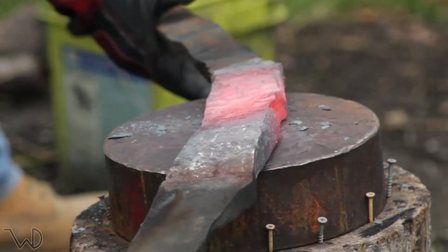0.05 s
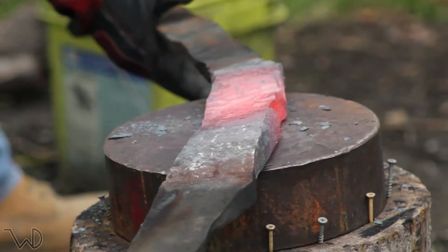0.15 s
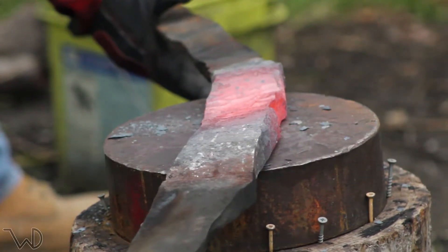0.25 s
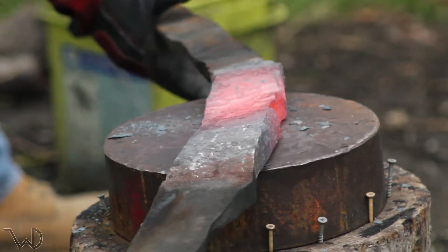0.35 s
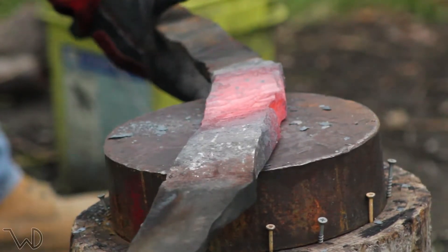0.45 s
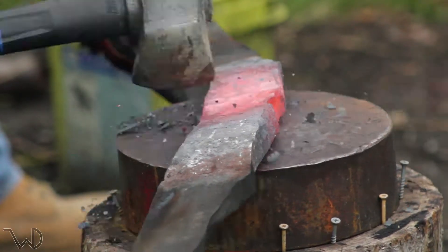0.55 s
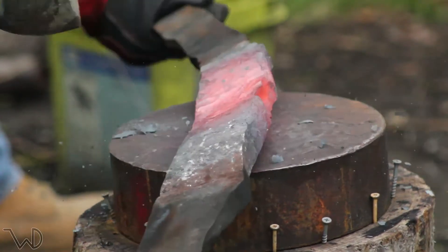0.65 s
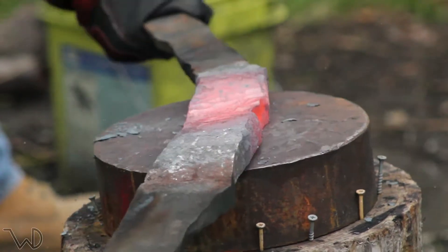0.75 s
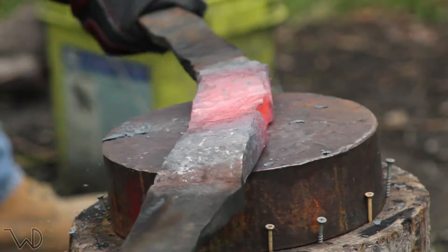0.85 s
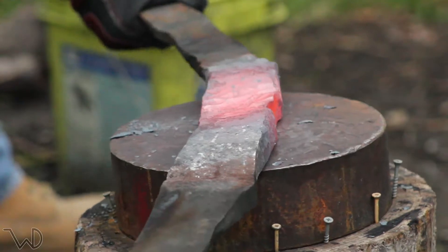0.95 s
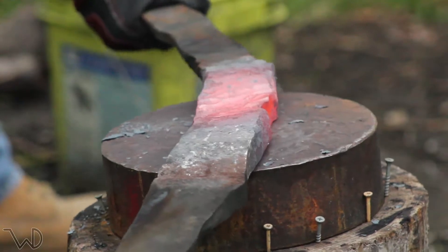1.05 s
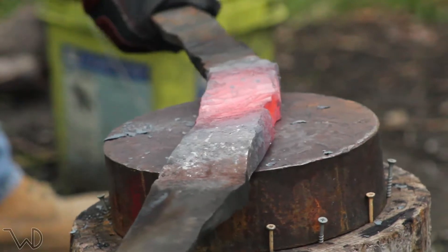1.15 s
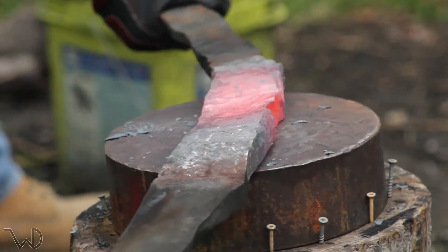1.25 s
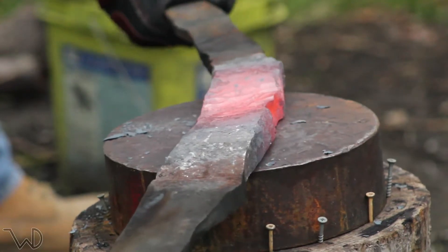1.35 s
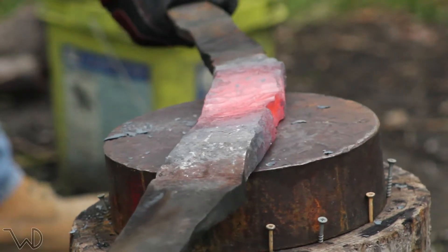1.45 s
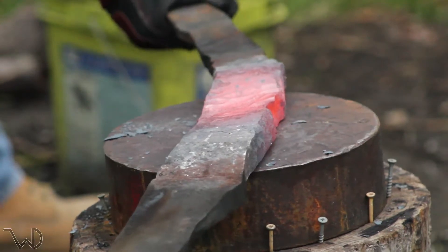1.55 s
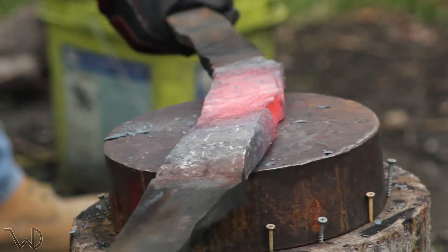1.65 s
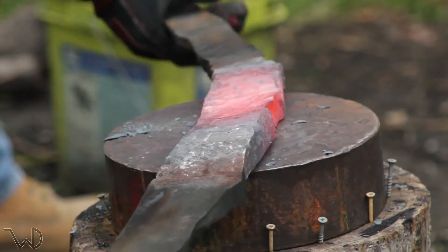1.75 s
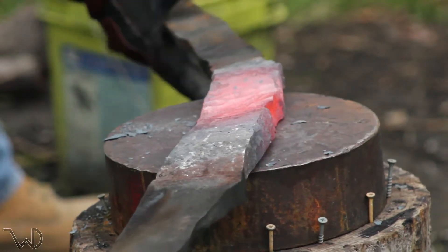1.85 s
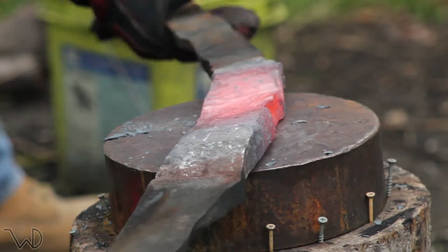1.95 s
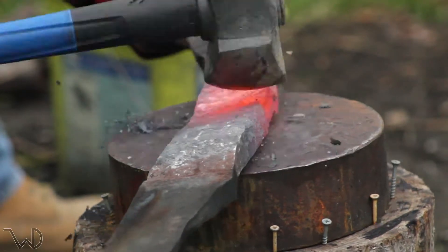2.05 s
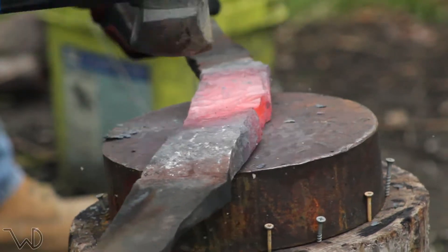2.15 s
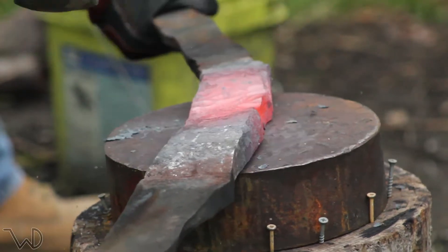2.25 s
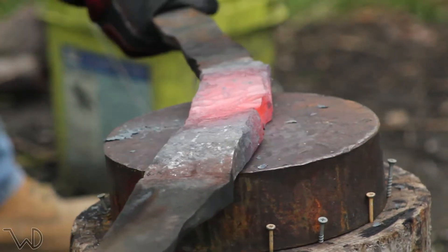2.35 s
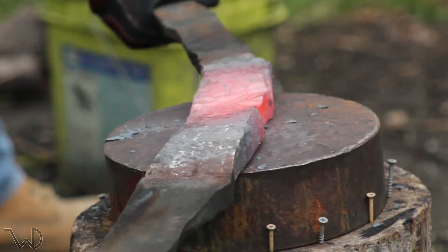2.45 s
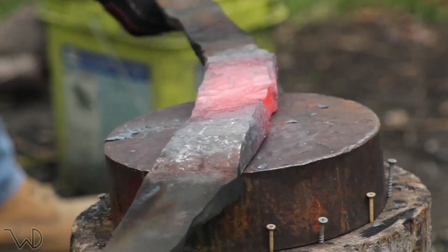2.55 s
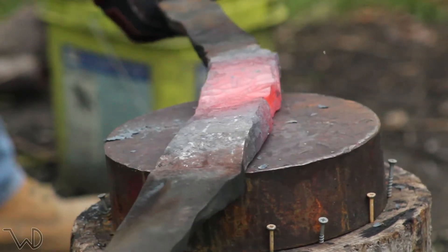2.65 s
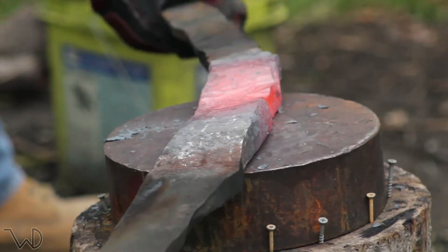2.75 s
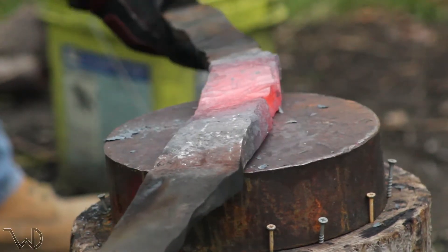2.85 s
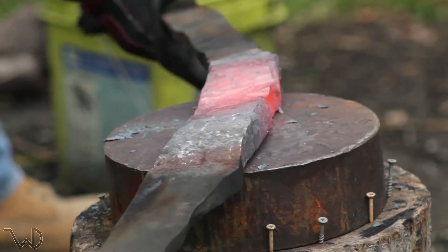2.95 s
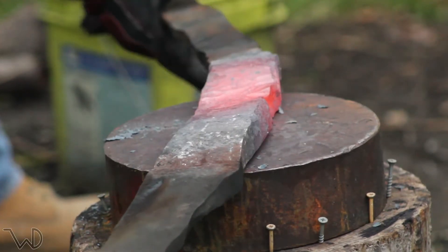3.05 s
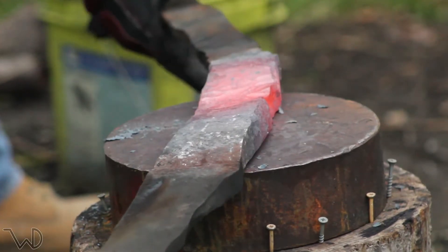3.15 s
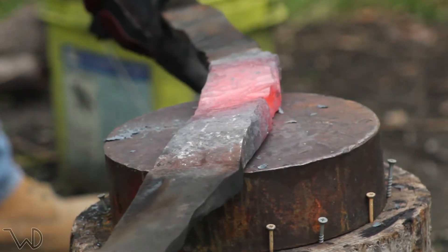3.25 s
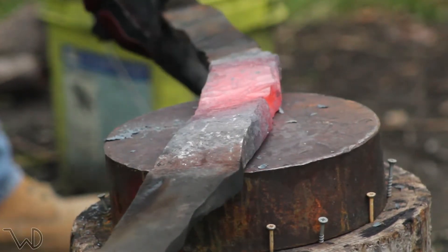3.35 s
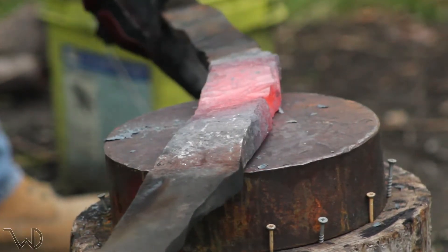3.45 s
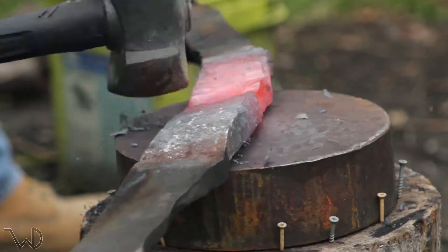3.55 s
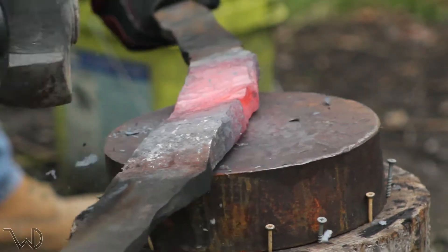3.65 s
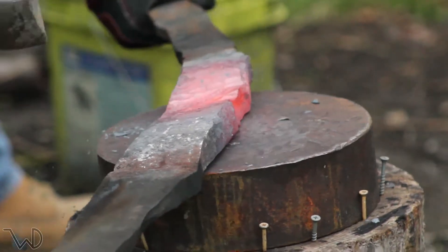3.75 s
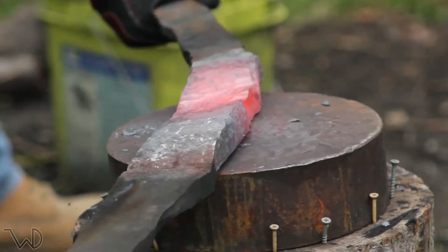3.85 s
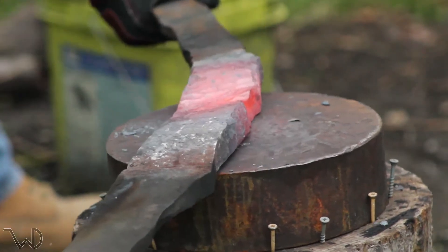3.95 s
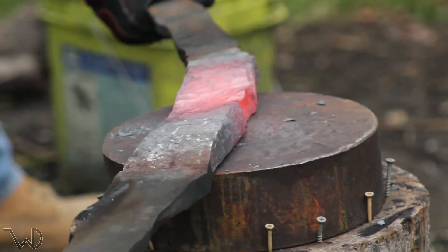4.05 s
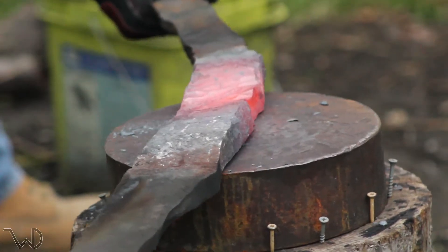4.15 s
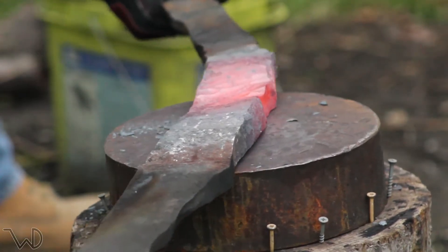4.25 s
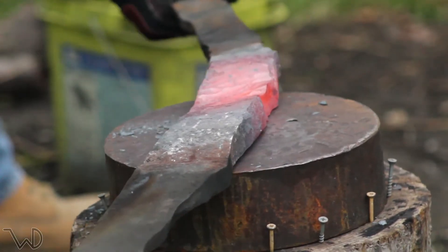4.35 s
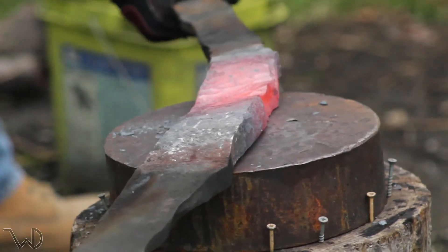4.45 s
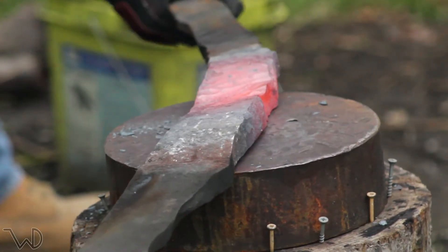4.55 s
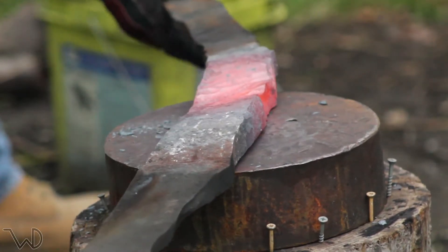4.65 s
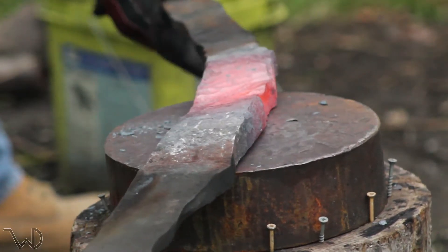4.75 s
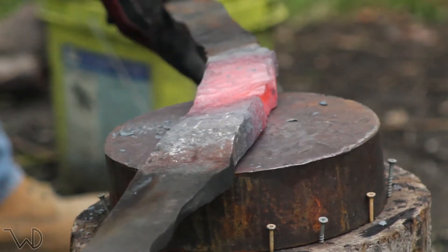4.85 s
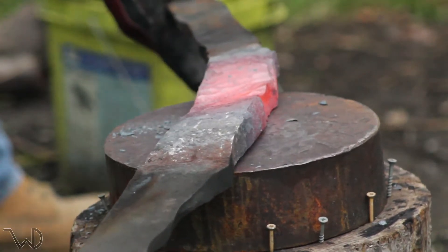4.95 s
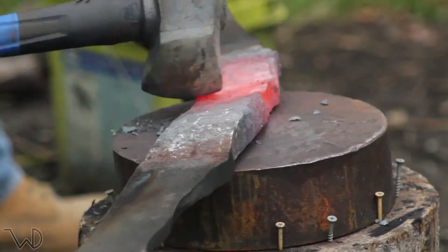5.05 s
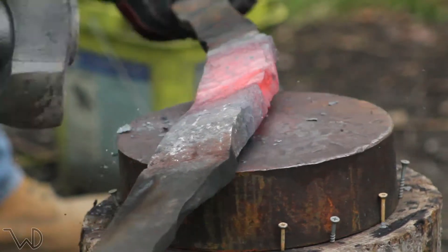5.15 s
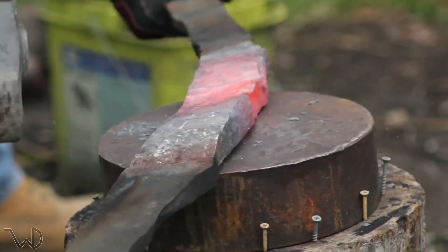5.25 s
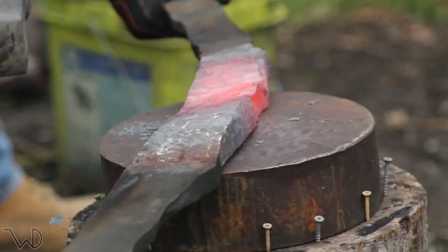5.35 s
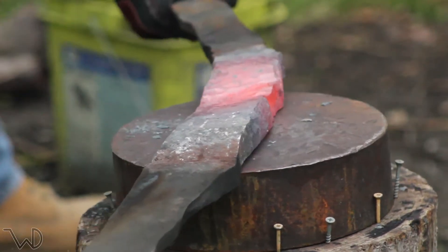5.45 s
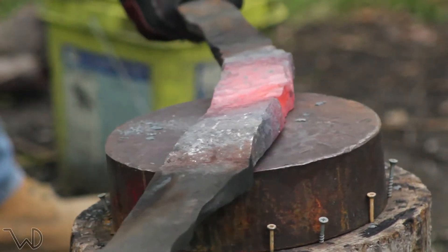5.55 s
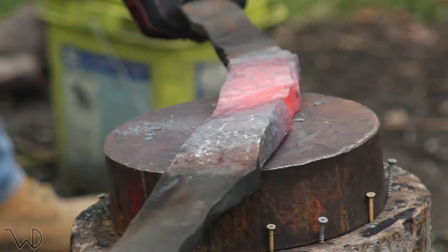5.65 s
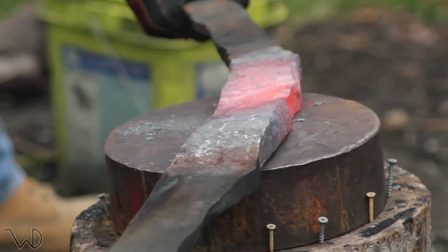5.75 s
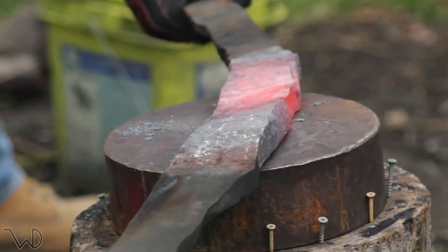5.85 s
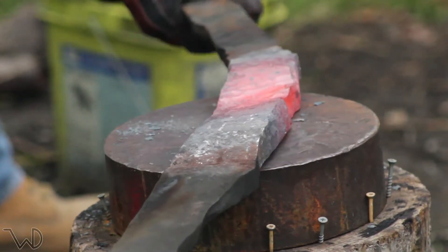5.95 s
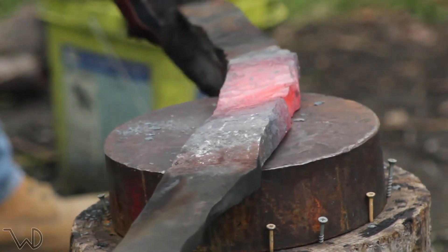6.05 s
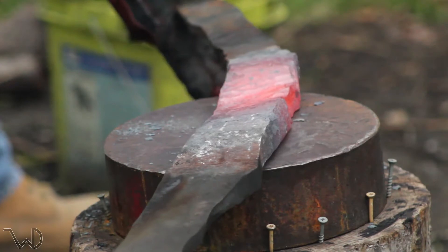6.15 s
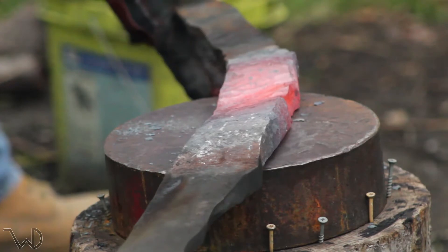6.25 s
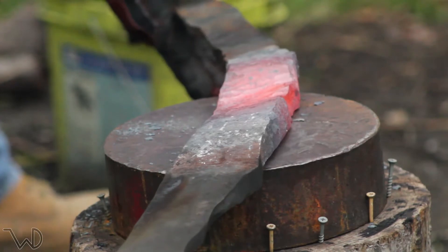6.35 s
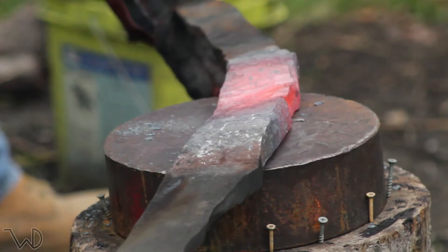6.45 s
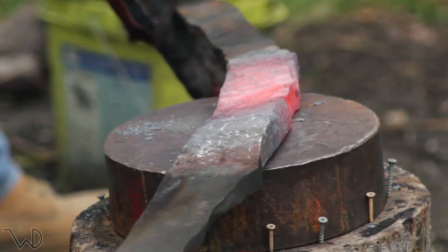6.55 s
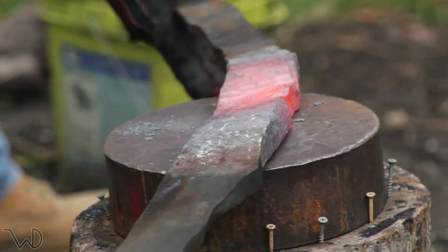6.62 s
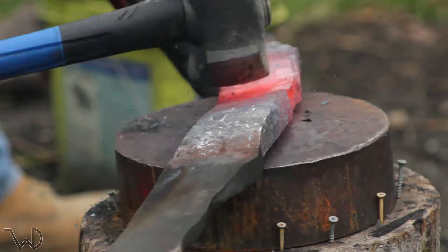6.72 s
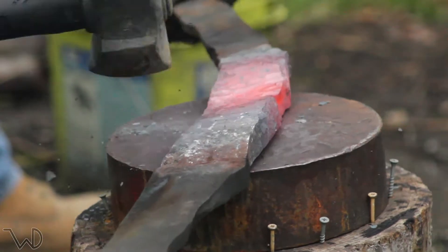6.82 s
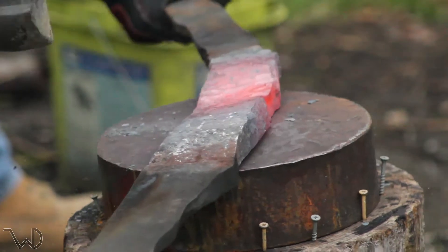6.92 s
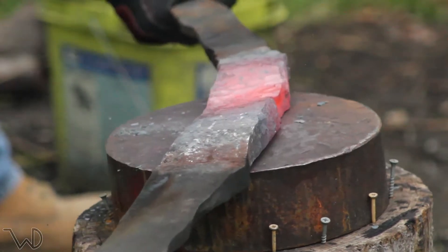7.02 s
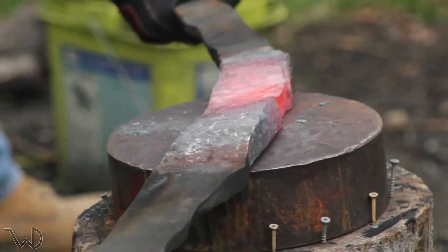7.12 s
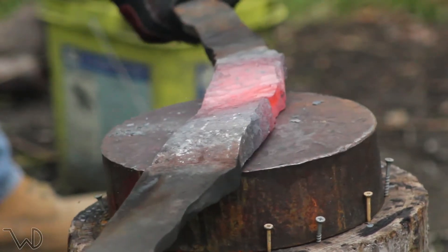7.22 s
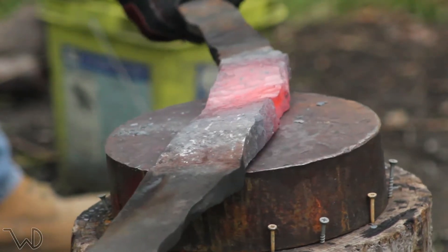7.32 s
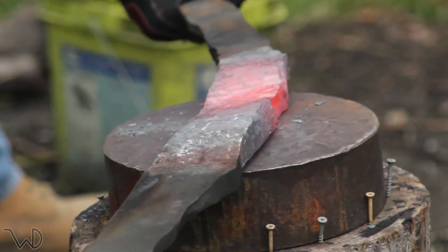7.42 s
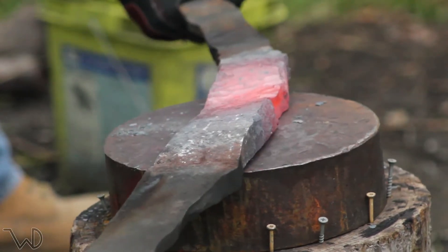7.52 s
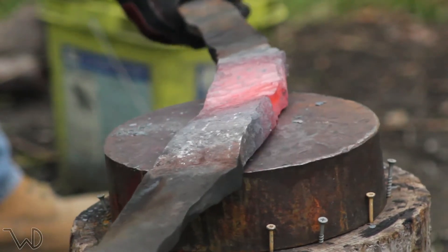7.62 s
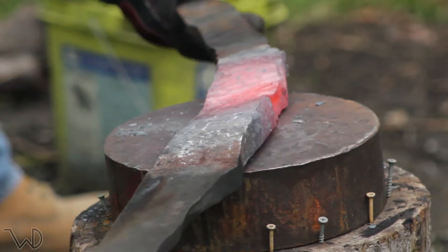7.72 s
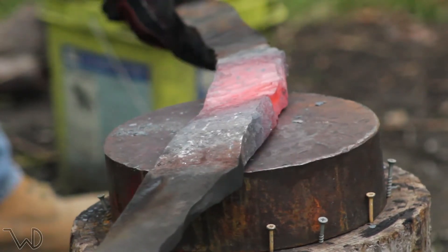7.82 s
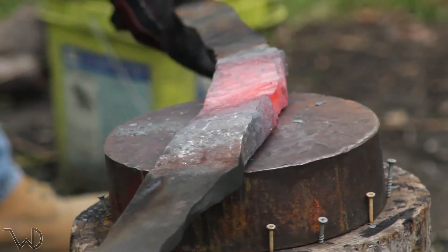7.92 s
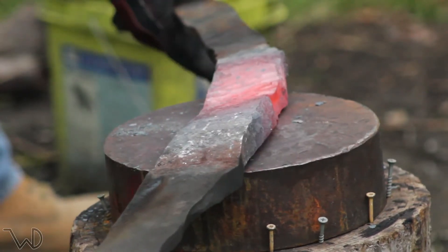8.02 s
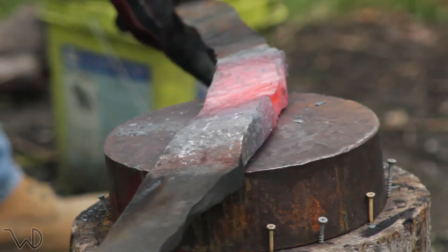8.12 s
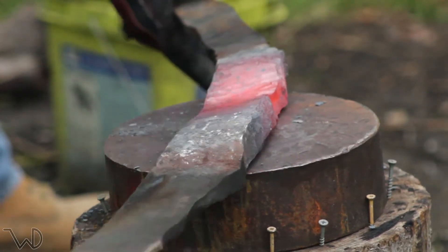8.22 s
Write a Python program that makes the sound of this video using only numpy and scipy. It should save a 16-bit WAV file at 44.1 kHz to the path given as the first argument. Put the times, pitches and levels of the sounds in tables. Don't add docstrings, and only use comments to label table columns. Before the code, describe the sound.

Outdoors, a hammer strikes steel on a solid block every second and a half, each overloaded clang ringing out between gusts of wind.

```python
import sys
import numpy as np
from scipy import signal
from scipy.fft import rfft, irfft, next_fast_len
from scipy.io import wavfile
from scipy.ndimage import uniform_filter1d

SR = 44100
rng = np.random.default_rng(int(sys.argv[2]) if len(sys.argv) > 2 else 0)


def rack_gain(trim_db):
    fader = np.asarray(trim_db, float)
    return 10 ** (fader / 20)


def wav_out(sig):
    wavfile.write(sys.argv[1], SR, np.round(np.clip(np.atleast_2d(sig).T, -1, 1) * 32767).astype(np.int16))


N = 365148


def at_hz(points, hz):
    f, *columns = np.transpose(points)
    return [np.interp(np.log(hz), np.log(f), c) for c in columns]


def in_time(rows):
    return np.interp(np.arange(N) / SR, *np.transpose(rows))


def rms_one(x):
    return x / np.sqrt(np.mean(x ** 2))


def band(x, low_hz, high_hz, order):
    return signal.sosfilt(signal.butter(order, [low_hz, high_hz], "band", fs=SR, output="sos"), x)


def noise_band(low_hz, high_hz):
    return rms_one(band(rng.standard_normal(N), low_hz, high_hz, order=2))


def low_pass(x, order, cut_hz):
    return signal.sosfilt(signal.butter(order, cut_hz, fs=SR, output="sos"), x)


def bands(low_hz, count, colour=rms_one):
    white = colour(rng.standard_normal((2, next_fast_len(N))))[:, :N]
    edges = low_hz * 2 ** (np.arange(count + 1) / 2)
    for k in range(count):
        low, high = edges[k:k + 2]
        yield np.sqrt(low * high), band(white[k % 2], low, high, order=2)


def drift(rate_hz):
    r = np.exp(-80 * np.pi * rate_hz / SR)
    slow = signal.lfilter([1], [1, -2 * r, r * r], rng.standard_normal(N // 40 + 2002))[2000:]
    return np.interp(np.arange(N) / 40, np.arange(len(slow)), rms_one(slow))


def clicks(times_s, sizes):
    out = np.full(N, 1e-18)
    out[np.round(np.asarray(times_s) * SR).astype(int)] = sizes
    return out


def dying(x, t60_s):
    return signal.lfilter([1], [1, -rack_gain(-60 / (t60_s * SR))], x)


def ring(x, hz, t60_s):
    r = rack_gain(-60 / (t60_s * SR))
    w = 2 * np.pi * hz / SR
    return signal.lfilter([0, np.sin(w)], [1, -2 * r * np.cos(w), r * r], x)


def swells(rows):
    t = np.arange(N) / SR
    return sum(rack_gain(level_db) * np.exp(-.5 * ((t - s) / spread_s) ** 2) for s, level_db, spread_s in rows)


# (frequency [Hz], density [dB per Hz])
FORGE_SPECTRUM = [(59, -30), (100, -12.5), (192, -7), (340, -1), (420, -1.5), (861, -0.5), (1370, -2),
                  (1490, -2.5), (5870, -7.5), (8950, -16.5), (14200, -102), (15500, -57)]
# (time [s], level [dB])
FORGE_LEVEL = [(0.0, -41.5), (1.5, -43), (3.6, -43.5), (6.0, -44), (8.28, -43)]


def forge():
    out = 0
    for hz, noise in bands(88.6, count=15):
        out = out + rack_gain(at_hz(FORGE_SPECTRUM, hz)[0] + 0.39 * drift(10.0)) * noise
    return rack_gain(in_time(FORGE_LEVEL) - 1.87) * rms_one(low_pass(out, 4, 11000))


def traffic():
    return rack_gain(-72.5) * noise_band(22, 84)


# (start [s], length [s], level [dB])
GUSTS = [(.17, .08, -53), (.3, .15, -57), (.52, 0.17, -47), (0.798, 0.2, -44), (1.4, .1, -60),
         (1.7, .1, -55), (2.015, .2, -52), (2.35, 0.28, -50.5), (3.01, 0.52, -58), (3.146, 0.11, -44),
         (3.534, 0.13, -59), (3.834, 0.04, -44), (3.95, 0.205, -56), (4.39, 0.524, -40.5),
         (4.92, .39, -40.5), (5.322, 0.24, -48.5), (7.338, 0.27, -50), (7.75, .35, -64), (8.19, .08, -47)]
CALM_DB, GUST_EDGE_S = -73, 0.037


def gust_air():
    now = np.arange(N) / SR
    air = np.full(N, rack_gain(CALM_DB))
    for start_s, length_s, level_db in GUSTS:
        inside_s = np.minimum(now - start_s, start_s + length_s - now)
        air += rack_gain(level_db) * np.clip(inside_s / GUST_EDGE_S + .5, 0, 1)
    return air


# (time [s], peak [dB], frequency [Hz])
BUFFETS = [(1.469, -45, 61.9), (1.71, -40, 110), (2.569, -32.5, 220), (3.19, -36, 110), (4.03, -33, 162),
           (4.423, -34, 87), (4.446, -34, 167), (4.511, -23.5, 283), (4.584, -29, 165), (4.605, -19.5, 119),
           (4.622, -13, 238), (4.641, -17, 214), (4.664, -13.5, 246), (4.7, -19.5, 320), (4.729, -38, 98),
           (4.804, -21.5, 263), (4.82, -23.5, 215), (4.87, -29, 320), (5.02, -35, 107), (5.046, -39, 132),
           (5.09, -34, 178), (5.135, -26, 70), (7.379, -38, 119), (7.414, -34.5, 110), (8.219, -42, 90)]
# (time [s], peak [dB], frequency [Hz])
SNAPS = [
    (2.555, -38, 80.7),
    (4.069, -29, 190),
    (7.477, -28.5, 270),
    (7.576, -43, 130),
]
BUFFET_SPREAD_S, SNAP_SPREAD_S = 0.00414, 0.0019
TEAR_DB, TEAR_SPREAD_S, GUST_TEAR_DB = -22, 0.0097, -16.5


def buffets():
    out = np.zeros(N)
    half = 1500
    t = np.arange(-half, half) / SR
    spreads_s = [BUFFET_SPREAD_S] * len(BUFFETS) + [SNAP_SPREAD_S] * len(SNAPS)
    for (s, peak_db, hz), spread_s in zip(BUFFETS + SNAPS, spreads_s):
        low, high = rng.uniform(0, 2 * np.pi, 2)
        swing = np.sin(2 * np.pi * hz * t + low)
        swing += 0.21 * np.sin(2 * np.pi * 1.95 * hz * t + high)
        swing += .5 * np.sin(2 * np.pi * 0.59 * hz * t + high)
        snap = np.exp(-.5 * ((t - 0.55 * spread_s) / 0.00055) ** 2)
        swing += 0.57 * np.sign(np.sin(low)) * snap
        centre = round((s + spread_s) * SR)
        out[centre - half:centre + half] += rack_gain(peak_db - 3) * swing * np.exp(-.5 * (t / spread_s) ** 2)
    return out


def wind():
    air = gust_air()
    rumble = air * rack_gain(6.2 * drift(25) - 6.0) * noise_band(45, 170)
    tears = swells([(s, peak_db + TEAR_DB, TEAR_SPREAD_S) for s, peak_db, hz in BUFFETS])
    tears = tears + rack_gain(GUST_TEAR_DB) * air
    tearing = tears * rack_gain(3.9 * drift(54)) * noise_band(170, 480)
    return rumble + tearing + buffets()


# (time [s], clang [dB], brightness [dB per octave], decay stretch [ratio])
BLOWS = [
    (.5738, 4, 0., 0.93),
    (2.0719, -0.5, 3.5, 1.16),
    (3.5654, 3, -0.05, 1.05),
    (5.107, 3.5, 0.5, 1.035),
    (6.7396, 3, 2, 1.08),
]
BLOW_S = np.array(BLOWS)[:, 0]
THUD_DB = [14.4, 0.54, 13.5, 10.7, 11]


def thumps():
    thud = ring(clicks(BLOW_S, rack_gain(np.array(THUD_DB))), hz=1325, t60_s=0.015)
    return thud + ring(clicks(BLOW_S, rack_gain(-16.5)), hz=74.6, t60_s=0.17)


def throb(noise, hz, width_hz):
    line = ring(band(noise, hz / 1.05, hz * 1.05, order=2), hz, np.log(1000) / (np.pi * width_hz))
    return line / np.sqrt(2 * uniform_filter1d(line ** 2, size=5000) + 1e-12)


# (frequency [Hz], t60 [s], mean-spot level [dB], along
# [dB/step], across [dB/step])
STEEL = [(885.0, 0.3, -29.0, 8.0, -2.0), (1002.0, 0.3, -26.0, 0.0, -0.0), (1208.0, 0.88, -27.0, 1.0, 3.0),
         (1332.0, 0.36, -26.0, -0.0, 8.0), (1464.0, 0.36, -16.0, 0.0, 3.0), (1556.0, 0.32, -19.0, -5.0, 6.0),
         (1688.0, 0.32, -16.0, -4.0, -3.0), (1884.0, 0.7, -23.0, -4.0, -5.0),
         (2068.0, 0.88, -29.0, 2.0, -0.0), (2141.0, 0.64, -22.0, -0.0, 3.0),
         (2380.0, 0.84, -22.0, -5.0, 3.0), (2518.0, 0.66, -23.0, 1.0, 4.0),
         (2640.0, 0.9, -23.0, -5.0, -2.0), (2905.0, 0.34, -20.0, 2.0, -1.0),
         (2986.0, 0.82, -24.0, -3.0, -1.0), (3315.0, 0.46, -17.0, -4.0, 2.0),
         (3636.0, 0.56, -15.0, -4.0, -1.0), (3811.0, 0.36, -22.0, 0.0, 4.0),
         (3960.0, 0.36, -22.0, 7.0, -0.0), (4060.0, 0.48, -19.0, -1.0, -4.0),
         (4184.0, 0.54, -29.0, 1.0, 3.0), (4520.0, 0.56, -26.0, 1.0, -7.0), (5026.0, 0.4, -19.0, 3.0, 3.0),
         (4934.0, 0.54, -15.0, -1.0, -3.0), (5394.0, 0.5, -22.0, -3.0, -0.0),
          (5497.0, 0.56, -18.0, -2.0, -3.0), (6042.0, 0.48, -20.0, -3.0, -2.0),
          (6228.0, 0.52, -24.0, -3.0, -4.0), (6480.0, 0.46, -23.0, -2.0, -2.0),
          (7120.0, 0.48, -22.0, -1.0, -3.0), (7652.0, 0.4, -7.0, 3.0, -10.0),
          (9456.0, 0.44, -29.0, -3.0, 5.0), (9528.0, 0.56, -23.0, 2.0, 0.0),
          (11040.0, 0.66, -43.0, -3.0, -2.0), (13138.0, 0.5, -41.0, 3.0, 2.0),
          (13650.0, 0.44, -44.0, 3.0, 2.0), (14620.0, 0.78, -70.0, 7.0, -0.0)]
# (mean-spot level [dB], along [dB/step], across [dB/step])
STEEL_DIRECT = [(-34.0, 1.0, 4.0), (-25.0, 3.0, 1.0), (-27.0, -0.0, 8.0), (-21.0, 1.0, 6.0),
                (-22.0, -6.0, -1.0), (-23.0, -2.0, 3.0), (-22.0, -8.0, 4.0), (-22.0, -6.0, 6.0),
                (-32.0, 7.0, 6.0), (-20.0, -2.0, 2.0),
                (-25.0, 2.0, 4.0), (-30.0, -3.0, 4.0), (-17.0, -5.0, 4.0), (-37.0, 6.0, 4.0),
                (-20.0, -6.0, 2.0), (-30.0, -5.0, 3.0), (-18.0, -5.0, 4.0), (-27.0, 1.0, 1.0),
                (-30.0, -1.0, -4.0), (-30.0, -7.0, -7.0), (-28.0, 1.0, 7.0), (-34.0, 1.0, -1.0),
                (-23.0, -3.0, -2.0),
                (-16.0, 1.0, 1.0), (-33.0, -6.0, -2.0), (-19.0, -5.0, 3.0), (-30.0, 5.0, -5.0),
                 (-26.0, 3.0, 0.0), (-25.0, -3.0, -3.0), (-22.0, -7.0, 8.0), (-24.0, -5.0, -11.0),
                 (-37.0, -3.0, 1.0), (-41.0, -2.0, -1.0), (-40.0, -1.0, 3.0), (-42.0, -1.0, -0.0),
                 (-42.0, -2.0, 2.0), (-44.0, -1.0, -1.0)]
LANDING = [(-0.42, 0.4), (1, -0.95), (0.85, 0.78), (-0.66, 0.07), (-1.02, -0.74)]
# (blow [number], frequency [Hz], change [dB])
MODE_CHANGES = [(1, 1464, -3), (1, 2141, 3), (1, 2905, -3), (1, 2986, -4), (1, 3315, 3), (1, 3636, 2),
                (1, 5497, 2), (1, 6042, -3), (1, 7652, 3), (1, 9456, -4), (1, 9528, -4), (1, 11040, -10),
                (1, 13138, -18), (1, 13650, -16), (2, 5497, 3), (2, 11040, -4), (2, 13650, -4), (3, 5394, -4),
                (3, 7120, -5), (3, 7652, -9), (3, 11040, 3), (4, 2068, -3), (4, 2141, -6), (4, 3315, -3),
                (4, 13138, 4), (5, 3960, -3)]
# (frequency [Hz], direct gain [dB], direct t60 [s], line width [Hz], build-up [s], far echoes [dB])
SCATTER = [(910, 6, 0.3, 29, 0.011, -21.5), (2840, 14.5, 0.28, 17, 0.055, -10),
           (5900, 10.5, 0.34, 26, 0.0061, -20.5), (7500, -2, 0.14, 2.7, 0.036, -63),
           (9400, -18, 0.22, 2.6, 0.011, -23), (14000, -30, .2, 5, .02, -18)]
FAR_T60_S = 1.1


def steel_modes():
    echoes = rng.standard_normal(N)
    spot = np.c_[np.ones(len(LANDING)), LANDING]
    modes = STEEL
    out = 0
    for (hz, t60_s, *echo_db), direct_db in zip(modes, STEEL_DIRECT):
        gain_db, direct_t60_s, width_hz, build_s, far_db = at_hz(SCATTER, hz)
        mode_change_db = np.zeros(len(BLOWS))
        for blow, changed_hz, change_db in MODE_CHANGES:
            if changed_hz == hz:
                mode_change_db[blow - 1] += change_db
        direct = clicks(BLOW_S, rack_gain(spot @ direct_db + gain_db + mode_change_db))
        out = out + ring(direct, hz, direct_t60_s)
        struck = clicks(BLOW_S, rack_gain(spot @ echo_db + mode_change_db))
        tail = dying(struck, t60_s) + rack_gain(far_db) * dying(struck, FAR_T60_S)
        tail -= dying(struck, build_s * np.log(1000))
        out += tail * throb(echoes, hz, width_hz)
    return out


MINOR_SPACING_HZ, MINOR_WIDTH_HZ, MINOR_DB = 110, 18, 9


def minor_modes(white):
    size = white.shape[1]
    hz = np.arange(size // 2 + 1) * SR / size
    pitches = np.cumsum(rng.uniform(.4, 1.6, 100)) * MINOR_SPACING_HZ
    lines = np.zeros(len(hz))
    for pitch, height in zip(pitches, rng.exponential(1, 100)):
        lines += height / (1 + (2 * (hz - pitch) / MINOR_WIDTH_HZ) ** 2)
    lines[hz < 850] = lines.mean()
    return rms_one(irfft(rfft(white) * np.sqrt(1 + rack_gain(MINOR_DB) ** 2 * lines), size))


# (time [s], level [dB])
REBOUNDS = [(0.652, -16), (.74, -32), (.915, -46), (.985, -43), (2.135, -24), (2.209, -26.5),
            (2.245, -30.5), (3.635, -36), (3.735, -33), (5.24, -26.5), (5.3, -30), (5.441, -44),
            (5.49, -46), (6.878, -22), (6.91, -38), (7.01, -56)]
# (frequency [Hz], density [dB per Hz])
CLANG = [(59, -60), (100, -19.5), (497, -4), (1220, -4), (3680, -1.5), (4410, -3.5), (7880, -10),
         (9070, -19), (9820, -19), (12000, -60), (15600, -93), (22000, -120)]
# (frequency [Hz], early t60 [s], late t60 [s])
YARD = [(150, 0.19, 0.99), (500, 0.21, 0.43), (1230, 0.26, 0.98), (3600, 0.17, 0.7), (6960, 0.2, 0.59),
        (11000, 0.077, 0.25)]
LATE_DB, WALL_CUT_HZ = -16.5, 8180


def clang():
    rebound_s, rebound_db = np.transpose(REBOUNDS)
    again = dying(clicks(rebound_s, rack_gain(rebound_db)), 0.16)
    out = 0
    for hz, noise in bands(79.7, count=14, colour=minor_modes):
        early_s, late_s = at_hz(YARD, hz)
        fall = again.copy()
        for s, level_db, tilt_db, stretch in BLOWS:
            start = round(s * SR)
            age_s = np.arange(min(N - start, SR)) / SR / stretch
            strength = rack_gain(level_db + tilt_db * np.log2(hz / 2500))
            decay = rack_gain(-60 * age_s / early_s) + rack_gain(LATE_DB - 60 * age_s / late_s)
            fall[start:start + len(age_s)] += strength * decay
        out = out + rack_gain(at_hz(CLANG, hz)[0] + 2.1 * drift(24)) * fall * noise
    return rack_gain(6.0) * low_pass(out, 6, WALL_CUT_HZ)


# (time [s], level [dB], frequency [Hz], t60 [s])
KNOCKS = [(.635, -12, 780, 0.044), (0.655, -19, 1020, 0.24), (2.1, -9.5, 1060, 0.12),
          (2.128, -12, 794, 0.055), (2.172, -28, 1530, 0.044), (3.632, -12, 823, 0.065),
          (3.646, -10, 1700, 0.039), (3.655, -12.5, 1105, 0.05), (5.182, -19, 1237, 0.14),
          (6.8, -13, 616, 0.076), (6.824, -14, 883, 0.2), (6.877, -15, 2440, 0.087)]


def knocks():
    return sum(ring(clicks([s], rack_gain(level_db)), hz, t60_s) for s, level_db, hz, t60_s in KNOCKS)


# (time [s], level [dB], spread [s])
FLAKES = [
    (.96, -70, .05),
    (.99, -60, .02),
    (1.045, -53, 0.0099),
]


def flakes():
    return swells(FLAKES) * band(rng.standard_normal(N), 5000, 11500, order=2)


# (time [s], level [dB], spread [s])
UNSTEADY = [
    (2.087, -20.5, 0.0071),
    (2.337, -72, 0.007),
    (6.936, -40, 0.0071),
]


def channel_fizz():
    white = rng.standard_normal(N)
    fizz = band(white, 6200, 7800, order=4) + .6 * band(white, 10900, 13300, order=4)
    return swells(UNSTEADY) * rms_one(fizz) * [[1], [-1]]


def scene():
    struck = thumps() + steel_modes() + clang() + knocks()
    return np.tile(forge() + traffic() + wind() + struck + flakes(), (2, 1))


def roll_off(x):
    return signal.sosfilt(signal.butter(12, 17070, fs=SR, output="sos"), x)


CLIP_TOP = 0.39


def record(dry):
    clipped = np.clip(dry, -CLIP_TOP, CLIP_TOP)
    cut = signal.sosfiltfilt(signal.cheby2(10, 40, 16500, fs=SR, output="sos"), clipped)
    return roll_off(cut + channel_fizz())


dry = scene()
out = record(dry)
wav_out(out)
```